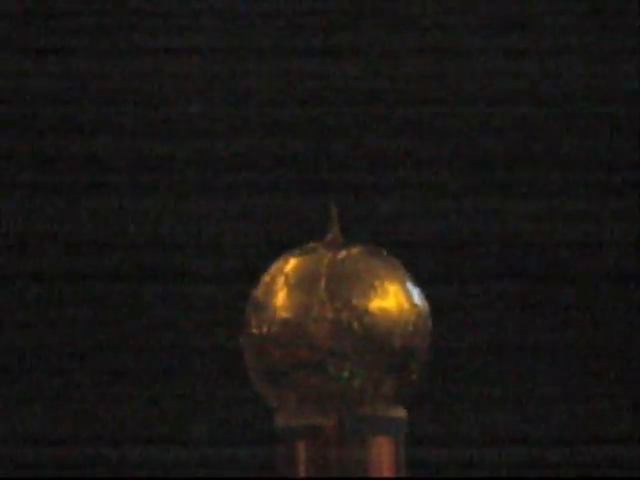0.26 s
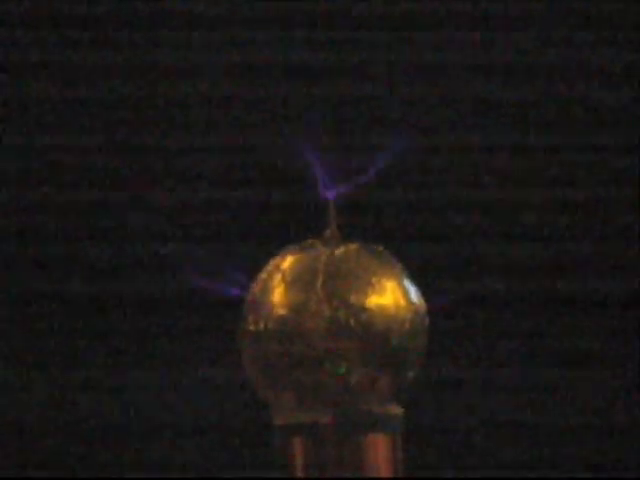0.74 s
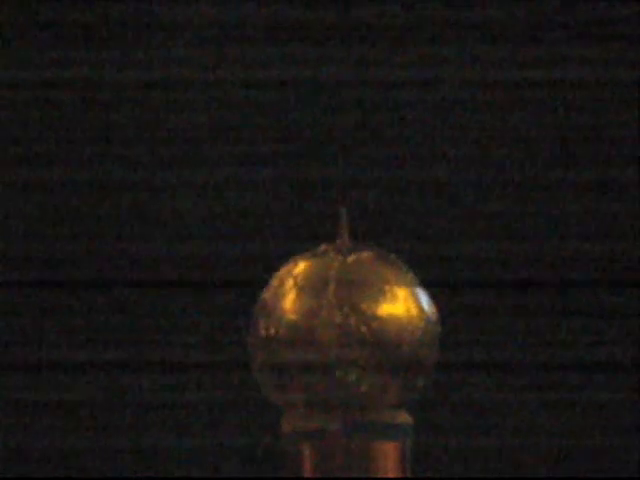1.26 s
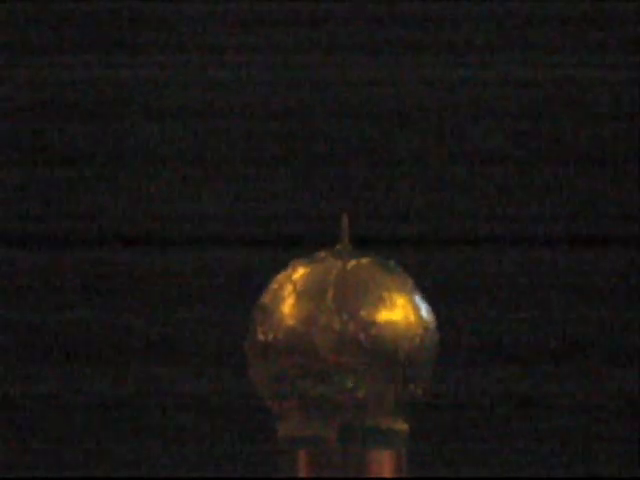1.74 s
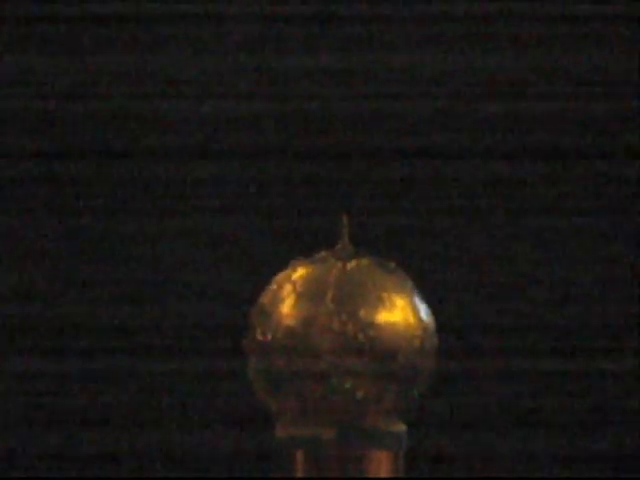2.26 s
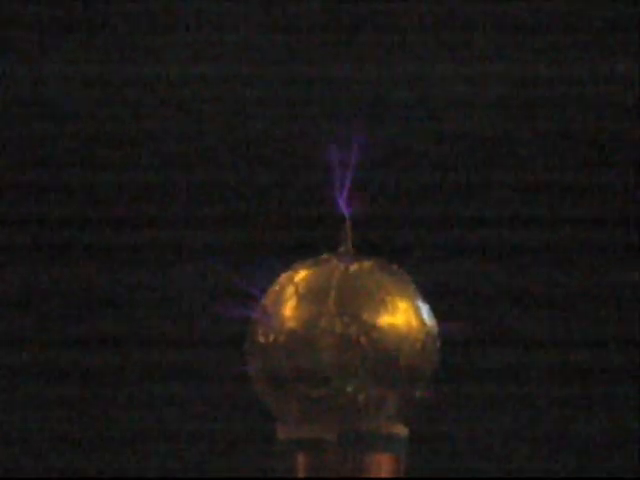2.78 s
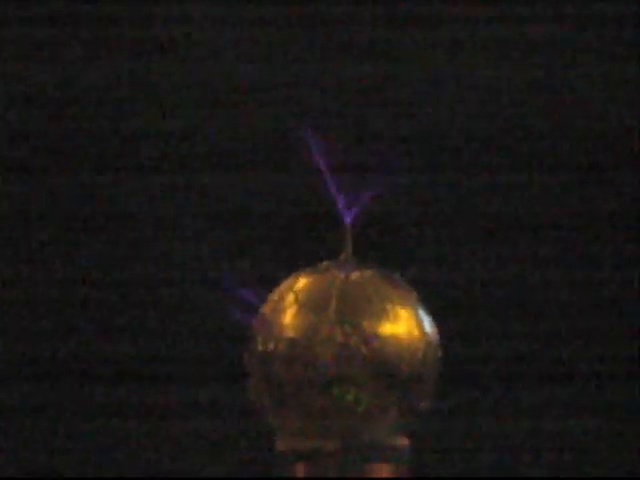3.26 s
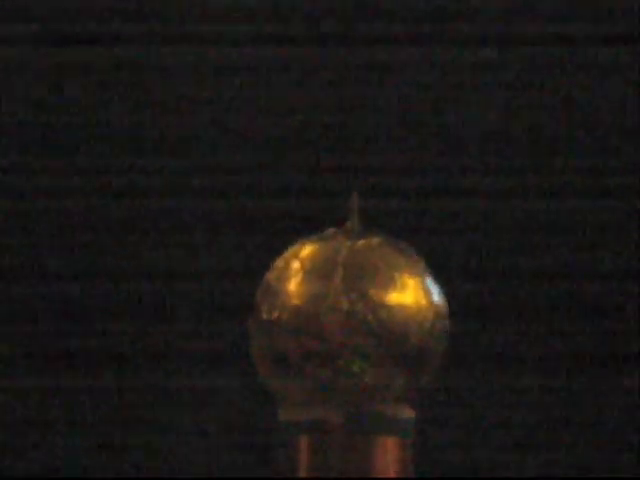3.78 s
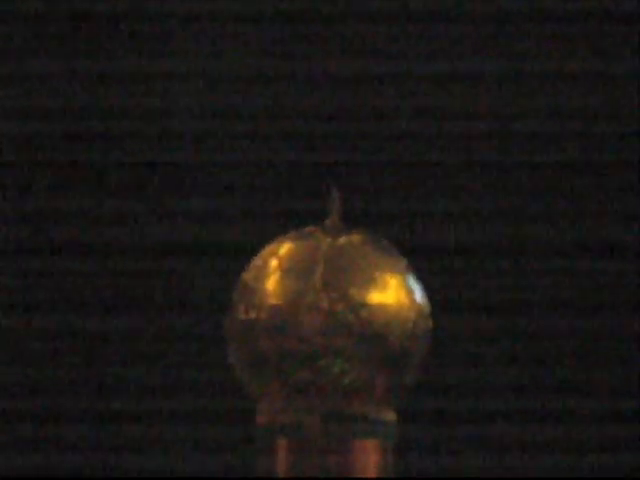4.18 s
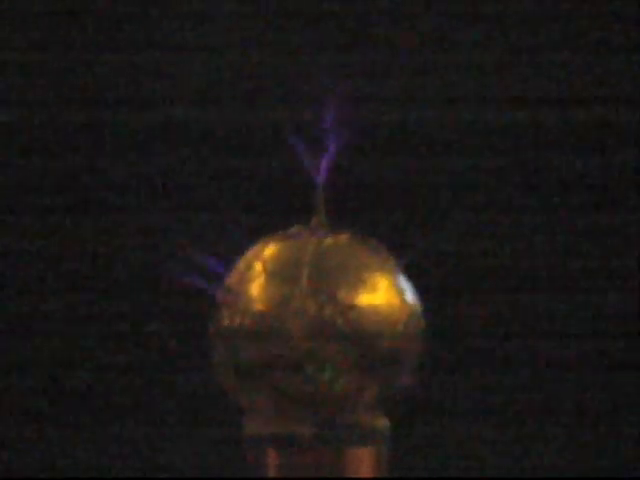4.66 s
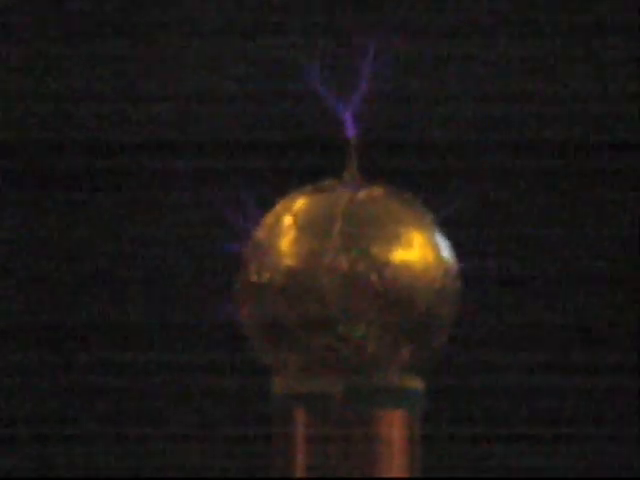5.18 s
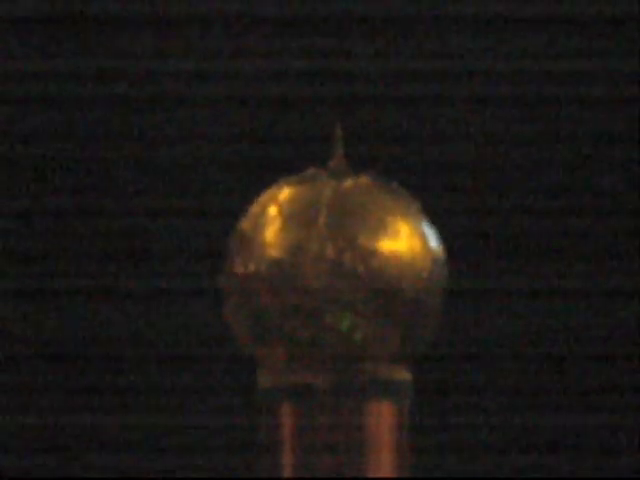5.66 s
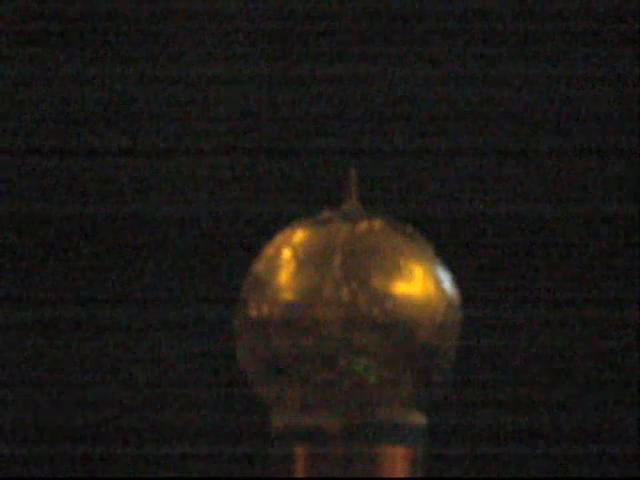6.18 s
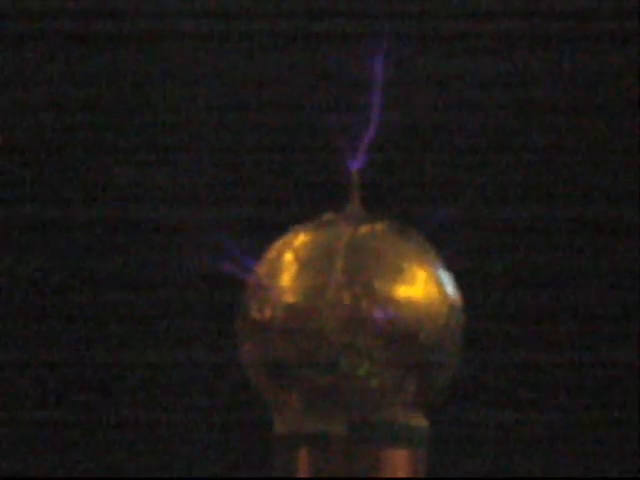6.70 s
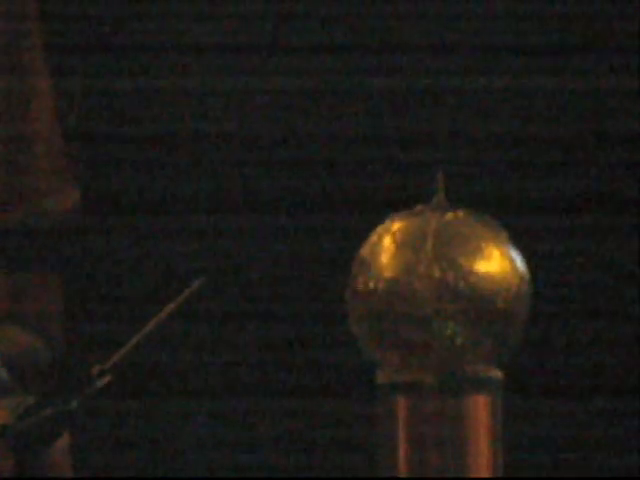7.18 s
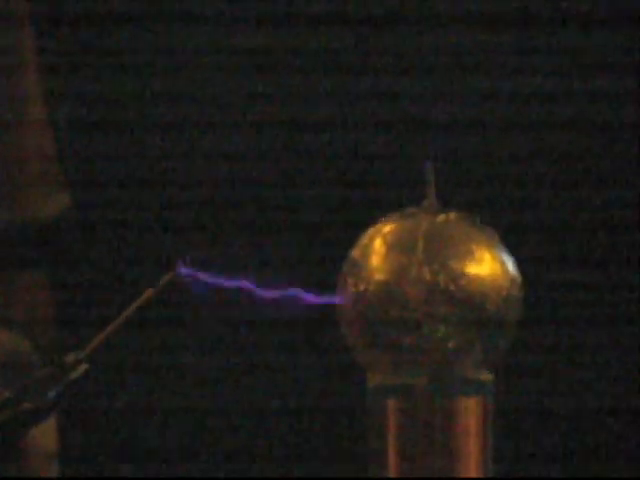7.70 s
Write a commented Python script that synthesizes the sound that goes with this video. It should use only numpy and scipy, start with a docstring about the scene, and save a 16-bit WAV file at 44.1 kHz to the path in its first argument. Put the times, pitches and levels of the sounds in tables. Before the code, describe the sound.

A small spark-gap coil on a table fires continuously, about fourteen hard, bright snaps a second, nearly regular but slightly uneven in strength. Each has a tiny hollow ring, a fizz of crackle and quick echoes from a small, dry room. Dull thumps from the overloaded microphone grow heavier as it goes on. One tiny dropout comes near 6.9 seconds; the sparking carries on to the end.

```python
"""A small spark-gap coil fires about fourteen times a second on a table in a small, dry room.
Each discharge is one impulse, coloured into a sharp snap by a hollow ring, crackle and short echoes.
Half-sine lumps add the dull thump of an overloaded microphone; decaying noise is the room's answer.
Faint coloured noise lies behind. The recorder runs at half rate and holds each sample;
a cut leaves one brief silence."""
import sys
import numpy as np
from scipy import signal
from scipy.fft import rfft, irfft
from scipy.io import wavfile

SR = 44100
rng = np.random.default_rng(int(sys.argv[2]) if len(sys.argv) > 2 else 0)


def unload_audio(sound):
    """Save the sound as a 16-bit wav file, at the path given as the first command line argument."""
    columns = np.transpose(np.atleast_2d(sound))
    # keep every value between -1 and 1, then stretch to whole-number steps
    steps = np.round(np.clip(columns, -1, 1) * 32767)
    wavfile.write(sys.argv[1], SR, steps.astype(np.int16))


N = 350154

SPARK_RATE_HZ, SPARK_COUNT = 14.52, 117
# how far the gap fires behind its steady beat, or ahead if negative: [start_s, late_ms]
LATENESS = [(0.0, 1.4), (0.69, -5.5), (0.9, 0.2), (1.03, -0.2), (1.24, 7), (1.52, 0.95), (1.79, 4.7),
            (2.41, -4.5), (3.65, -3), (3.79, 2), (4.34, -4.5), (4.61, -11), (4.89, -9.5), (5.79, 5.5),
            (6.06, 4), (6.2, 8.5), (6.61, 6.5), (6.75, 1.5), (7.09, 6), (7.23, 2.6), (7.58, 5), (7.92, 2)]
# strength of the snaps, before chance and overall level: [start_s, level_db]
SNAP_LEVEL = [(0, -2.5), (2.82, -4), (6.06, -2), (6.27, -4), (6.75, -5.5), (6.96, -1.5), (7.16, -3.5),
              (7.37, -1), (7.92, -1.7)]
# strength of the microphone thumps, before chance and overall level: [start_s, level_db]
THUMP_LEVEL = [(0, -1), (1.86, 6), (2.82, 3), (2.96, -3), (3.1, 6.5), (3.31, 1.5), (3.44, 7), (3.72, -4.5),
               (3.86, 8.5), (4.06, 2.5), (4.34, 6.5), (4.48, -9), (4.68, 9), (5.72, 6.5), (5.86, 12),
               (6.13, 14), (6.4, -3.5), (6.61, 9), (6.75, -6), (7.04, 10.5), (7.92, 10)]
# discharges with their own time and levels, hard, weak or heavy: [start_s, snap_db, thump_db]
STANDOUTS = [(0.0001, -10.5, -6), (0.1353, -3, 7.5), (0.3448, -4, -4), (0.4801, -2, 7), (0.6828, -1.5, 7),
             (1.5177, -3, -3), (2.6146, -4.5, -4), (4.4032, -1.8, 1), (4.6723, -0.5, 8.5), (5.0193, 0, 3),
             (5.0887, -6, 1), (5.2304, -2.5, 9), (5.298, -1.5, 12), (5.37, -3.8, -4), (5.4405, -1.5, 4),
             (6.4809, -4.5, 11), (6.5496, -1, 0), (6.855, -9, 0), (6.908, -1, 6), (7.1169, -1.2, 11),
             (7.5968, -0.5, 13), (7.7332, -2, 2.5), (7.8005, -3, -9)]


def discharges(jitter_ms=.6, snap_spread_db=.5, thump_spread_db=1.82, beat_skip_s=.0539):
    """The capacitor charges and the gap breaks down on a nearly steady beat; gives times, snap and thump dB."""
    beat = np.arange(SPARK_COUNT) / SPARK_RATE_HZ
    # from the cut on, the beat comes earlier
    beat = beat - beat_skip_s * (beat > CUT_SILENCE[0])
    chance = rng.standard_normal((SPARK_COUNT, 3)) * [jitter_ms, snap_spread_db, thump_spread_db]
    curves = [np.interp(beat, *np.transpose(table)) for table in (LATENESS, SNAP_LEVEL, THUMP_LEVEL)]
    late_ms, snap_db, thump_db = chance.T + curves
    sparks = np.c_[beat + late_ms / 1000, snap_db, thump_db]
    # each standout replaces the discharge nearest to it in time
    for row in STANDOUTS:
        sparks[np.argmin(abs(beat - row[0]))] = row
    return sparks.T


# colour of the snap with its echoes: [pitch_hz, level_db]
SNAP_COLOUR = [(100, -24.5), (300, -21.5), (500, -8), (850, -11.5), (1200, -6.5), (1600, -6.5),
               (2200, -0.4), (2900, -0.5), (3500, 0), (4400, -2), (5500, 1.1), (6600, -4.5), (8100, -6.5),
               (9300, -15.5), (10300, -16)]
# nearest echo; coming later in the last second, it brings out 3 kHz: [start_s, delay_ms]
NEAREST_ECHO = [(0, .27), (6.82, .28), (6.9, .32)]
# dull, upside-down echo that hollows the body of the snap; its delay slowly grows: [start_s, delay_ms]
DULL_ECHO = [(0, 1.55), (2.5, 1.6), (4, 1.8), (5, 2.0), (7.9, 2.06)]
# further echoes from the apparatus and the table: [delay_ms, level_db]
UPRIGHT_ECHOES = [(1.36, -11), (3.17, -7), (3.89, -14)]
# echoes that arrive upside down: [delay_ms, level_db]
INVERTED_ECHOES = [(.82, -6), (2.81, -2)]
# distinct wall echoes: [delay_ms, level_db]
WALL_ECHOES = [(9.2, -11.5), (9.5, -15), (14.5, -12.5), (14.8, -16)]


def snaps(times, snap_db, nearest_db=4.5, dull_db=-10.5, small_parts_hz=1480, size=2048):
    """One impulse per discharge with its echoes; the arc takes a slightly different path every time."""
    hz = np.fft.rfftfreq(size, 1 / SR)
    ms = np.arange(size) * 1000 / SR
    nearest_ms = np.interp(times[:, None], *np.transpose(NEAREST_ECHO))
    dull_ms = np.interp(times[:, None], *np.transpose(DULL_ECHO))
    # the small parts of the apparatus reflect only the waves above this pitch
    bass = 1 / (1 + (hz / small_parts_hz) ** 4)

    direct = 1.5 + echoes(hz, [(nearest_ms, nearest_db)])
    hollowed = direct * (0.5 - bass * echoes(hz, [(dull_ms, dull_db)]))
    small_parts = (1 - bass) * (echoes(hz, UPRIGHT_ECHOES) - echoes(hz, INVERTED_ECHOES))
    walls = echoes(hz, WALL_ECHOES, jitter_ms=0.087)
    paths = (hollowed + small_parts + walls) * hollow_ring(times, hz)

    # branching streamers add about a millisecond of fresh crackle to each snap
    crackle_db, crackle_ms = -15.5, .8
    crackle = from_db(crackle_db) * wander(size, 0) * np.exp(-ms / crackle_ms)
    heard = irfft(paths) + crackle
    # equal energy first, then the strength of each discharge
    heard = heard / np.linalg.norm(heard, axis=1, keepdims=True)
    strength = from_db(snap_db + 15.5)
    return colour(at_sparks(times, heard * strength[:, None]), SNAP_COLOUR)


def echoes(hz, rows, jitter_ms=.012, spread_db=1.3):
    """Reflections as delayed, scaled copies of the impulse: one spectrum per discharge."""
    total = 0
    for delay_ms, level_db in rows:
        gain = from_db(level_db + spread_db * wander(1, 0))
        # delays change gradually from one discharge to the next
        delay_s = (delay_ms + jitter_ms * wander(1, 0.95)) / 1000
        total = total + gain * np.exp(-2j * np.pi * hz * delay_s)
    return total


# short, hollow ring of each snap; its pitch jumps up at about three seconds: [start_s, pitch_hz]
HOLLOW_RING = [(0, 940), (2.7, 910), (3.3, 1290), (6, 1170), (7.9, 1160)]


def hollow_ring(times, hz, ring_db=-4.5, width_hz=420.0):
    """Response of one broad resonance on top of the plain snap, one row per discharge."""
    centre_hz = np.interp(times[:, None], *np.transpose(HOLLOW_RING))
    damping = 1j * hz * width_hz
    return 1 + from_db(ring_db) * damping / (centre_hz ** 2 - hz ** 2 + damping)


def thumps(times, thump_db, width_ms=0.51, widening=0.049, width_spread_db=2.4, recovery_hz=27.5, size=256):
    """The overloaded microphone is pushed to one side in a half-sine lump; it then creeps back."""
    ms = np.arange(size) * 1000 / SR
    # a harder overload lasts longer and sounds duller; width_ms is for a 0 dB thump
    width = width_ms * np.exp(widening * thump_db[:, None]) * from_db(width_spread_db * wander(1, 0))
    push = np.sin(np.pi * np.clip(ms / width, 0, 1))
    # the level sets the area of the lump, whatever its width
    push = push / push.sum(axis=1, keepdims=True)
    pushes = at_sparks(times, from_db(thump_db + 4.5)[:, None] * push)
    recovery = signal.butter(1, recovery_hz, "high", fs=SR, output="sos")
    # the tiny offset keeps the filter clear of slow, vanishing numbers
    return signal.sosfilt(recovery, pushes + 1e-18)


# colour of the reverberation: [pitch_hz, level_db]
ROOM_COLOUR = [(70, -27.5), (150, -14), (300, -13), (1000, -13), (1600, -13.5), (2200, -8.5), (2750, -3.5),
               (3400, -8), (4500, -3), (6000, -4.5), (7200, -10.5), (8300, -11.5), (9300, -20.5),
               (10300, -22)]


def reverberation(times, snap_db, room_db=-18.5, t60_s=0.23, follow=0.022, build_ms=0.55,
                  fixed_db=-4.5, drifting_db=-2.5, fresh_db=-5.5, grain_db=1.0, size=10000):
    """The room answers each bang with decaying noise: part fixed, part slowly drifting, part fresh."""
    t = np.arange(size) / SR
    fixed = from_db(fixed_db) * rng.standard_normal(size)
    drifting = from_db(drifting_db) * wander(size, 0.86)
    fresh = from_db(fresh_db) * wander(size, 0)
    pattern = fixed + drifting + fresh
    # reflections arrive in clusters about a millisecond long
    cluster_level = np.interp(t * 1000, np.arange(size), rng.standard_normal(size))
    clusters = from_db(grain_db * cluster_level)
    build_up = 1 - np.exp(-1000 * t / build_ms)
    decay = from_db(-60 * t / t60_s) * build_up
    # the reverberation varies far less in strength than the direct snap
    strength = from_db(room_db + follow * snap_db)
    return colour(at_sparks(times, strength[:, None] * pattern * clusters * decay), ROOM_COLOUR)


# colour of the background noise, before its overall level: [pitch_hz, level_db per Hz]
FLOOR_COLOUR = [(15, 9), (50, 1), (150, -4.5), (300, -15), (1000, -8), (3000, -4), (8000, -30),
                (10300, -47)]


def background(level_db=-37):
    """Faint, steady noise: white noise shaped by a long filter that can follow the bass."""
    return from_db(level_db) * colour(rng.standard_normal(N), FLOOR_COLOUR, size=8192)


def from_db(db):
    """Decibels to gain."""
    return 10 ** (np.asarray(db) / 20)


def colour(x, spectrum, size=1024):
    """Causal (minimum-phase) filter that follows (Hz, dB) points and closes above the last."""
    hz, db = np.transpose(spectrum)
    grid = np.maximum(np.fft.rfftfreq(size, 1 / SR), 1)
    curve_db = np.interp(np.log(grid), np.log(np.r_[hz, SR / 4]), np.r_[db, -60])
    # folding the cepstrum onto positive time gives the minimum phase
    cepstrum = irfft(np.log(from_db(curve_db)))
    cepstrum[1:size // 2] *= 2
    cepstrum[size // 2 + 1:] = 0
    impulse_response = irfft(np.exp(rfft(cepstrum)))
    return signal.oaconvolve(x, impulse_response)[:N]


def at_sparks(times, shapes):
    """Lays one short sound per discharge on the time line."""
    out = np.zeros(N + SR)
    for s, shape in zip(times, shapes):
        start = max(round(s * SR), 0)
        out[start:start + len(shape)] += shape
    return out[:N]


def wander(size, memory):
    """Random rows of spread 1, each partly like that of the discharge before."""
    memory = np.clip(memory, 0, .999)
    rows = rng.standard_normal((SPARK_COUNT, size))
    for k in range(1, len(rows)):
        rows[k] = memory * rows[k - 1] + np.sqrt(1 - memory ** 2) * rows[k]
    return rows


def scene():
    """Snaps, room and thumps over a faint background."""
    times, snap_db, thump_db = discharges()
    floor = background()
    mix = snaps(times, snap_db) + reverberation(times, snap_db) + thumps(times, thump_db) + floor
    return mix[None]


# the brief silence left by a cut: [start_s, end_s]
CUT_SILENCE = (6.854, 6.869)


def record(dry, band_edge_hz=9410.0, cutoff_hz=15600, top=.55):
    """Rounds the peaks; holding every second sample mirrors treble above 11 kHz; a cut leaves a brief silence."""
    t = np.arange(N) / SR
    rounded = top * np.tanh(dry / top)
    band_limit = signal.butter(10, band_edge_hz, fs=SR, output="sos")
    narrow = signal.sosfilt(band_limit, rounded)
    held = np.repeat(narrow[:, ::2], 2, axis=1)[:, :N]
    held = held * ((t < CUT_SILENCE[0]) | (t > CUT_SILENCE[1]))
    # a steep low-pass trims the top of the mirrored treble
    treble_limit = signal.ellip(8, .3, 80, cutoff_hz, fs=SR, output="sos")
    return signal.sosfilt(treble_limit, held)


dry = scene()
out = record(dry)
unload_audio(out)
```